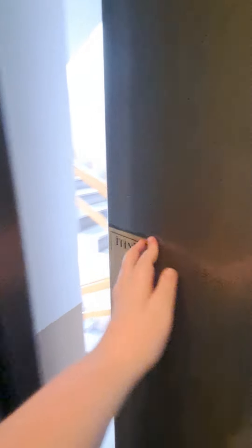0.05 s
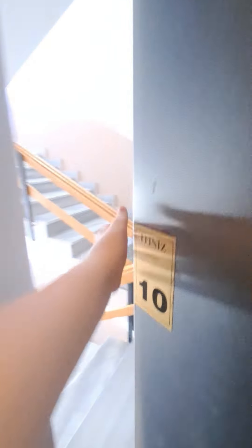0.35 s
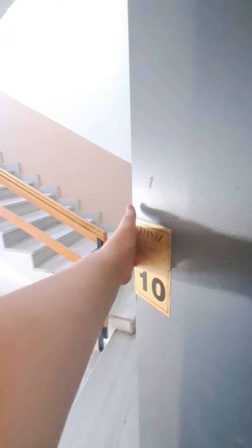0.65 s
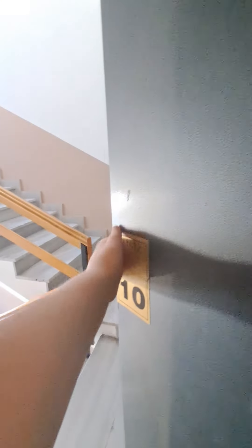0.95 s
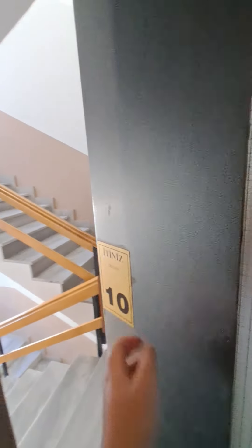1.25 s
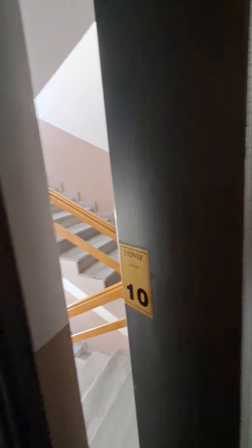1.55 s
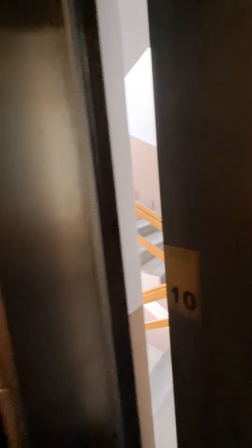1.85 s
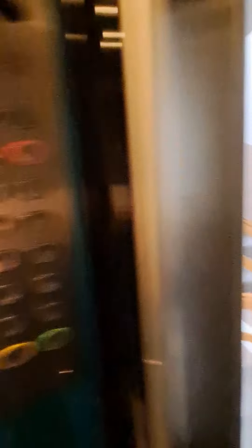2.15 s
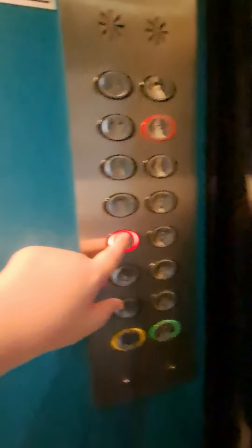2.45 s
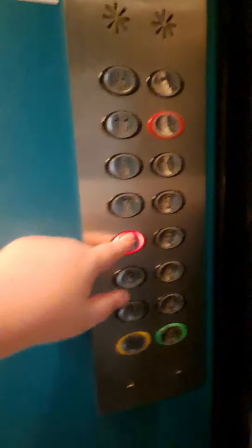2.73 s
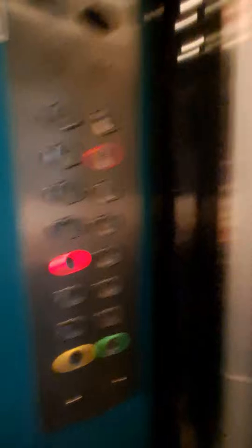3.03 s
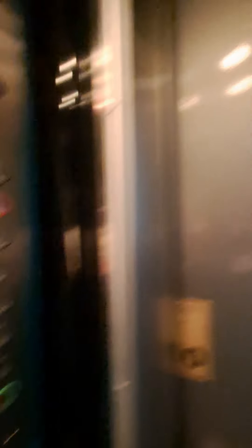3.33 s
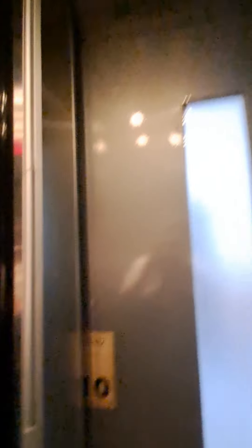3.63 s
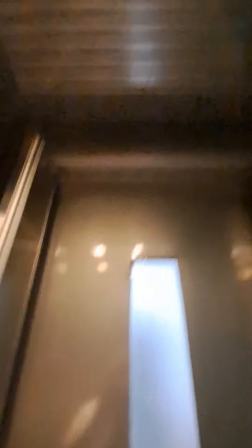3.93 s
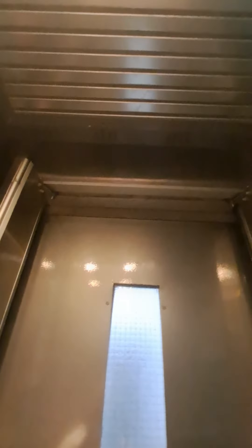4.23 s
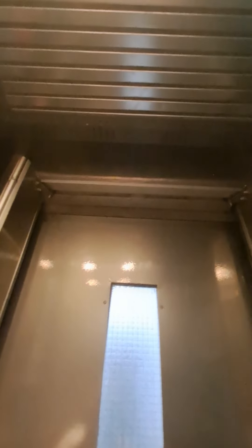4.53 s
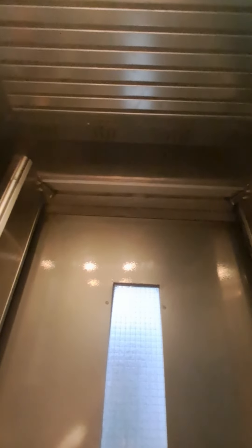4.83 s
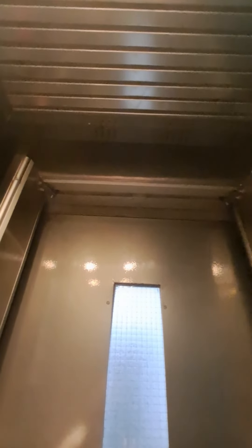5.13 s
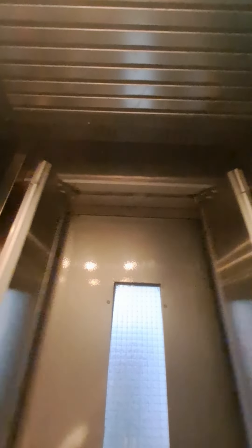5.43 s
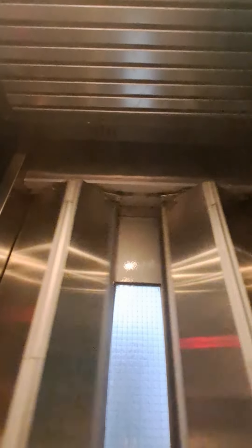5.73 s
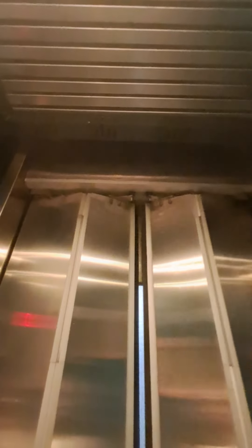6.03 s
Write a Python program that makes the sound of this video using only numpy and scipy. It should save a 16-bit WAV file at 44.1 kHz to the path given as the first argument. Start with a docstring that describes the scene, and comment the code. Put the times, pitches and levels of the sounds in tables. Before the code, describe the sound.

A few knocks on a metal door give way to heavy, booming steps, clothing rustle and small clicks as a person enters an elevator. The outer door then bangs shut and grinds into its frame. After sharp relay clacks, folding doors rumble along their track, clattering and squeaking thinly. The handheld microphone is inside the ringing steel cabin, picking up soft low bumps and a faint fan hum.

```python
"""Doors of an old steel lift

A hand works the hinged landing door; someone steps onto the booming floor and presses a button.
The door slams and shudders home, a relay clacks, and folding inner doors rattle along their track.
Impacts and friction excite the damped modes of the steel, while a faint fan hums throughout."""
import sys
import numpy as np
from scipy import signal
from scipy.fft import rfft, irfft, next_fast_len
from scipy.io import wavfile
from scipy.ndimage import uniform_filter1d

SR = 44100
rng = np.random.default_rng(int(sys.argv[2]) if len(sys.argv) > 2 else 0)


def waveform_to_disk(signal):
    """Save audio, clipped to [-1, 1], as 16-bit WAV at the path in sys.argv[1]."""
    frames = np.transpose(np.atleast_2d(signal))
    scaled = np.clip(frames, -1, 1) * 32767
    samples = np.round(scaled).astype(np.int16)
    wavfile.write(sys.argv[1], SR, samples)


N = 268128
T = np.arange(N) / SR
RING_SIZE = 32768  # samples in one impulse response
RING_FREQS = np.fft.rfftfreq(RING_SIZE, 1 / SR)

# Impacts. Each row: start in seconds, nominal body, clank, clack and tick levels in dB,
# pitch of the struck part in Hz.
SLAM_HITS = [(3.812, -34, -28.5, -29.5, -37, 3450), (3.824, -34.5, -22.5, -27, -43.5, 310),
             (3.841, -34.5, -26.5, -17, -16, 11550), (3.852, -38.5, -22.5, -25.5, -32.5, 2680),
             (3.872, -35.5, -27, -28.5, -45, 487), (4.102, -42, -42, -41.5, -69, 2100),
             (4.126, -30.5, -24.5, -53, -64, 3400)]  # the landing door meets latch and frame, then settles
RELAY_HITS = [(4.542, -73, -75, -54, -54.5, 6960), (4.587, -57, -44.5, -41, -40, 1235),
              (4.857, -48, -59, -50.5, -51.5, 6830)]  # door lock and motor relay
LEAF_HITS = [(4.899, -50, -40, -54.5, -58, 750), (4.949, -44, -40, -37, -49, 2700),
             (5.022, -30, -33.5, -43.5, -38.5, 2120), (5.076, -28.5, -38.5, -44.5, -81, 1365),
             (5.226, -36.5, -36, -42.5, -44.5, 1480), (5.254, -33.5, -43, -43, -45.5, 910),
             (5.314, -30.5, -68, -38, -53, 396), (5.377, -63, -46, -27.5, -44, 3900),
             (5.414, -37.5, -25, -39.5, -59, 3520), (5.49, -44.5, -30, -36, -41.5, 2860),
             (5.547, -32.5, -34, -30.5, -34.5, 2330), (5.6, -30, -28, -42, -56, 423),
             (5.643, -36, -33, -28, -50, 907), (5.675, -69, -25.5, -37, -40.5, 2780),
             (5.705, -31, -26.5, -37, -64, 3720), (5.838, -54, -23, -32, -51, 1315),
             (5.917, -43, -34, -24.5, -40.5, 2580), (5.962, -44, -24.5, -22, -36, 3450),
             (5.99, -48, -30, -28, -51, 2060), (6.012, -34.5, -27.5, -33.5, -32, 1400)]  # folding leaves knock in their hinges
ENTRY_HITS = [(0.005, -30.5, -32.5, -48, -56, 473), (0.036, -32.5, -30.5, -43.5, -43.5, 540),
              (0.08, -37, -40, -35, -77, 466), (0.242, -31, -41.5, -36.5, -40.5, 550),
              (0.453, -33, -39, -35.5, -43, 5670), (0.565, -47, -42, -56, -58, 553),
              (0.981, -48, -48, -59, -58, 372), (1.194, -55, -49, -68, -75, 380),
              (1.293, -49, -42, -41, -59, 2130), (1.713, -56, -54, -54.5, -59.5, 3950),
              (1.878, -52, -46, -43, -47, 6800), (2.003, -33.5, -34.5, -30.5, -79, 1180),
              (2.055, -34, -31, -32, -80, 367), (2.162, -50, -47, -39.5, -79, 375),
              (2.229, -50.5, -38.5, -42.5, -43.5, 382), (2.348, -34.5, -38, -27, -36.5, 1600),
              (2.503, -32, -36, -43, -44.5, 390), (2.644, -45, -38, -44, -79, 400),
              (2.704, -32, -59, -45.5, -39, 377), (2.788, -42, -43, -37.5, -38, 1700),
              (2.848, -45.5, -38, -35.5, -45, 780), (3.248, -60.5, -56.5, -51, -65, 1670),
              (3.312, -51, -45, -39, -61, 1970), (3.421, -27.5, -37.5, -32.5, -45.5, 2850)]  # hand, door, shoes and button
# Edges of the body, clank, clack and tick bands in Hz.
BAND_EDGES_HZ = [130, 400, 1500, 7000, 16000]

# Normal modes. Each row: frequency in Hz, level over the diffuse ring in dB, T60 in seconds.
DOOR_MODES = [(109, 7, 0.99), (303.6, 11.1, 0.23), (353, 2.5, 0.29), (487, 8, 0.33), (593, 5.7, 0.31),
              (781, 4.4, 0.38), (910, 11, .25), (1321, 8.7, 0.22), (1435, 8, 0.19), (2636, 5, 0.12),
              (2603, 5.2, .14), (4665, 7, .08), (8100, 3.1, 0.073), (9780, 8, 0.051), (11700, 6, 0.055),
              (12500, 9.5, 0.058)]
RELAY_MODES = [(953, 2.5, 0.18), (1220, 9.86, .09), (1320, 19, 0.22), (2040, 4, 0.98), (6550, 8.8, 0.2),
               (6850, 7.8, 0.29), (12430, 4.8, 0.23)]
LEAF_MODES = [(237.1, 15.6, 0.6), (366.6, 6.9, 0.33), (382.7, 2.5, 0.29), (433.6, 9.4, 0.41),
              (549, 3.8, 0.074), (638.5, 12.6, 0.38), (904, 7.6, 0.23), (1105, 3.9, 0.23),
              (1376, 8.1, 0.13), (2081, 11, 0.13), (2546, 4.3, 0.072), (3550, 1, 0.084), (3810, 2.2, 0.08),
              (6600, 4, .05)]
CABIN_MODES = [(186, 11.5, 0.61), (242, 2, 0.78), (303.3, 10.5, 0.15), (492, 13.5, 0.58), (1910, 1.5, .04),
               (2510, 2, 0.028), (2853, -6, 0.071)]
# Diffuse ring of the steel box. Each row: frequency in Hz, base T60 in seconds.
RING_DECAY = [(100, 0.23), (400, 0.28), (1500, 0.26), (5000, 0.23), (14000, 0.2)]
# Stereo width. Each row: frequency in Hz, side minus mid in dB.
STEREO_WIDTH = [(50, -15.5), (140, -14), (260, -10), (500, -5), (1000, 0.5), (12000, 0.5)]
# Resonances of the rollers and of the hinges in Hz.
ROLLER_HZ = [438.4, 618, 820, 917, 1096]
HINGE_HZ = [1220, 2230, 2550, 2900, 3660]

# The landing door shakes on its hinges. Each row: start and hold in seconds, level in dB.
DOOR_SHAKES = [(3.8, .15, -30), (4.11, 0.027, -29), (4.25, 0.021, -34)]
# The closer drags it along the frame. Each row: start and hold in seconds, grind and buzz in dB.
DOOR_DRAGS = [(3.788, .01, -44, -47), (3.81, .04, -37, -32), (3.9, 0.24, -36, -51),
              (4.04, 0.0703, -34, -51)]
# The inner leaves rattle as they unfold and meet. Each row: start and hold in seconds, level in dB.
RATTLE_BOUTS = [(4.92, 0.34, -62), (5.23, .02, -41), (5.4, 0.016, -31), (5.49, .01, -33.5),
                (5.56, 0.02, -31), (5.66, 0.056, -34), (5.87, .03, -34.5), (5.955, 0.035, -27)]
# Pushes and shifts of weight. Each row: start and hold in seconds, floor sway and wall boom in dB.
PUSHES = [(-0.03, .08, -27.5, -29), (0.27, 0.22, -47, -40), (0.72, 0.059, -42, -42),
          (1.0, .13, -42.5, -42.5), (1.33, 0.021, -54, -49), (1.6, 0.41, -44, -55.5),
          (1.9, 0.068, -32, -37.5), (2.02, 0.15, -26, -25.5), (2.41, 0.19, -29.5, -33),
          (2.62, 0.1, -27.5, -35.5), (2.88, 0.21, -35.5, -52.5)]
# Their bearing as the microphones turn. Each row: time in seconds, left minus right in dB.
PUSH_PAN = [(0.3, -0.5), (0.6, -3.5), (1.4, -1.5), (1.8, 0)]
# Hand, shoes and clothes rub. Each row: start and hold in seconds, scuff and rustle in dB.
STROKES = [(-0.03, .03, -37, -46.5), (0.18, .03, -38, -48.5), (0.24, 0.027, -43, -47.5),
           (0.55, 0.016, -51.5, -51.5), (0.66, 0.0084, -45.5, -59.5), (1.0, 0.13, -51, -61),
           (1.55, 0.02, -64, -50), (1.9, .05, -41, -37.5), (2.02, 0.034, -31.5, -45.5),
           (2.26, 0.1, -44, -42), (2.34, 0.025, -30, -43), (2.66, .16, -48, -49), (2.94, 0.11, -95, -49)]
# Low thumps, dry slips. Each row: start in seconds, pitch in Hz, peak in dB, length in seconds.
THUMPS = [(0.062, 86, -22, 0.084), (0.896, 75.4, -28, 0.027), (1.098, 79, -32, 0.036),
          (1.989, 56.3, -16, 0.052), (2.04, 173.4, -18, 0.14), (2.429, 41.4, -17.5, 0.069),
          (2.44, 29, -24.5, 0.16), (2.646, 31, -21, 0.091), (2.657, 63.7, -20, 0.086),
          (2.733, 56, -18, 0.043), (3.42, 178.5, -40.5, 0.14), (3.917, 99, -31, 0.048),
          (4.115, 93.3, -21, 0.072), (5.132, 82, -18, 0.043), (5.429, 78.4, -23.5, 0.058),
          (5.619, 80.5, -20.5, 0.086), (5.692, 238.6, -23, 0.082), (5.976, 79.4, -21, 0.08)]
SQUEAKS = [(0.03, 12040, -35, 0.019), (0.242, 12070, -33.5, 0.032), (0.569, 12050, -41.5, 0.025),
           (1.216, 12000, -54, 0.023), (2.39, 9800, -42, 0.012), (2.499, 9660, -32.5, .012),
           (5.361, 9800, -34.5, 0.039), (5.47, 13000, -35, 0.041), (5.495, 13000, -33, 0.024),
           (5.909, 12740, -29, 0.071), (5.936, 9900, -27, 0.02)]
# Motor hum of the fan. Each row: frequency in Hz, rms level in dB.
FAN_TONES = [(91.5, -61.5), (167, -72.5), (242, -71), (344.5, -75.5)]

# Spectral envelopes. Each row: frequency in Hz, relative spectral density in dB.
DOOR_SHAKE_COLOUR = [(20, -24.5), (50, 8.5), (75, 8), (93, 24.5), (108, 17.5), (140, -61.5)]
GRIND_COLOUR = [(100, -17.5), (160, 2), (240, -4), (300, -13), (370, -0.5), (520, -7.5), (650, -8),
                (850, -9.5), (1100, -17.5), (1500, -21.5), (2500, -49)]
BUZZ_COLOUR = [(900, -22.5), (1600, -3), (2800, -3), (4200, -10), (6000, -9.5), (8000, -18), (12000, -14.5),
               (16000, -22.5)]
TRACK_SWAY_COLOUR = [(20, -13), (50, 8), (65, 10), (83, 10), (105, 9.5), (150, -55)]
ROLLER_COLOUR = [(100, 1), (150, 8), (200, -7), (240, -1), (290, -2.5), (420, 0.5), (650, -7), (1000, -8.5),
                 (1500, -12), (2500, -34.5)]
HINGE_COLOUR = [(900, -21), (1600, -1), (2600, 4.5), (4000, 3), (5200, -3), (6500, -6), (7800, -17),
                (10000, -13), (13000, -11.5), (16000, -43)]
FLOOR_SWAY_COLOUR = [(20, 8.5), (30, 0), (42, -6.5), (56, 23), (70, 15), (86, 18), (100, 13), (118, -9),
                     (150, -43)]
WALL_BOOM_COLOUR = [(110, -19), (145, -5), (163, -3), (173, 2.5), (186, -6), (205, -13), (240, -8),
                    (275, -19), (340, -16.5), (450, -29.5), (700, -76.5)]
SCUFF_COLOUR = [(250, -16), (330, 2), (480, -1), (650, -3), (1000, -3.5), (1500, -6.5), (2500, -36)]
RUSTLE_COLOUR = [(900, -34), (1600, 13.5), (2700, 12), (4500, 6.5), (6500, 7), (7800, -2.5), (12500, -0.5),
                 (16000, -4)]
FAN_COLOUR = [(25, -1.5), (60, 0), (92, 4), (134, -11.5), (242, -24), (354, -13.5), (500, -27.5),
              (1000, -30.5), (1500, -36.5), (2000, -37.5), (2500, -44), (16000, -51.5)]


def landing_door():
    """Impact and sliding friction: the door strikes latch and frame, shudders and grinds home."""
    shake = swells(DOOR_SHAKES, attack_s=0.017, t60_s=0.54) * rumble(DOOR_SHAKE_COLOUR, steady_s=0.06)
    grind, buzz = swells(DOOR_DRAGS, attack_s=0.017, t60_s=0.58)
    grinding = grind * friction(GRIND_COLOUR, DOOR_MODES, per_s=700, scatter_db=2.9)
    buzzing = buzz * friction(BUZZ_COLOUR, [], per_s=900, scatter_db=4.7)
    slam = impacts(SLAM_HITS, DOOR_MODES, ring_scale=0.89, bass_db=3.5, top_db=-13,
                   treble_pan_db=-2, part_db=7, part_q=9)  # the latch is on the right
    return shake + grinding + buzzing + slam


def folding_doors():
    """Rolling contact: sway and roller noise grow as powers of motor speed, while loose hinges rattle."""
    motor_start_s, spin_up_s = 4.732, 0.7
    speed = 1 - np.exp(-np.maximum(T - motor_start_s, 0) / spin_up_s)
    rattle = swells(RATTLE_BOUTS, attack_s=0.025, t60_s=0.5)
    rollers = joints(ROLLER_COLOUR, ROLLER_HZ, per_s=80, scatter_db=4, load_shift_db=9)
    hinges = joints(HINGE_COLOUR, HINGE_HZ, per_s=45, scatter_db=4.5, load_shift_db=5)
    sway = undb(-26.5) * speed ** 1.42 * wobble() * rumble(TRACK_SWAY_COLOUR, steady_s=0.08)
    return sway + undb(-27.5) * speed ** 1.88 * rollers + rattle * hinges


def leaf_clatter():
    """Backlash: the folding leaves knock in their hinges and ring at their normal modes."""
    return impacts(LEAF_HITS, LEAF_MODES, ring_scale=1.22, bass_db=-9, top_db=-5.5,
                   treble_pan_db=2.5, part_db=7, part_q=18)


def relay():
    """Brief contact gives a broad spectrum: the lock and motor relay pull in with bright clacks."""
    return impacts(RELAY_HITS, RELAY_MODES, ring_scale=0.97, bass_db=-2, top_db=1,
                   treble_pan_db=2, part_db=5.5, part_q=8.8)


def passenger():
    """Structure-borne sound: weight shakes the cabin, shoes and clothes rub, hand and feet knock."""
    sway, boom = swells(PUSHES, attack_s=0.019, t60_s=1.29)
    floor = sway * wobble() * rumble(FLOOR_SWAY_COLOUR, steady_s=0.04)
    walls = boom * rumble(WALL_BOOM_COLOUR, steady_s=0.075)
    bearing = pan_gains(np.interp(T, *np.transpose(PUSH_PAN)))
    scuff, rustle = swells(STROKES, attack_s=0.028, t60_s=0.52)
    shuffle = envelope(0, attack_s=0.028, hold_s=3.35, t60_s=0.52)  # faint motion between strokes
    shoes = np.hypot(scuff, undb(-56) * shuffle) * friction(SCUFF_COLOUR, [], per_s=500, scatter_db=4.4)
    rustle = np.hypot(rustle, undb(-64.5) * shuffle)
    clothes = rustle * friction(RUSTLE_COLOUR, [], per_s=400, scatter_db=3.8)
    knocks = impacts(ENTRY_HITS, CABIN_MODES, ring_scale=0.97, bass_db=1, top_db=-10.5,
                     treble_pan_db=1.5, part_db=4.5, part_q=10.5)
    return (floor + walls) * bearing + shoes + clothes + knocks


def thumps():
    """Tone bursts: soft low thumps of a few cycles, from bumps in the cabin and microphone handling."""
    out = np.zeros((2, N))
    for start_s, hz, db, length_s in THUMPS:
        t = np.arange(int(length_s * SR)) / SR
        add(out, start_s, undb(db) * np.sin(np.pi * t / length_s) * np.sin(2 * np.pi * hz * t))
    return out


def squeaks():
    """Frictional excitation: dry metal slips and drives a high resonance that lingers in the cabin."""
    out, half_width_hz = np.zeros((2, N)), 450
    for start_s, hz, db, length_s in SQUEAKS:
        slip = rng.standard_normal(RING_SIZE) * (np.arange(RING_SIZE) < length_s * SR)
        resonance = 1 / (1 + 1j * (RING_FREQS - hz) / half_width_hz) ** 2
        chirp = irfft(rfft(slip) * steel([], ring_scale=0.7) * resonance)
        add(out, start_s, undb(db) * chirp / np.abs(chirp).max())
    return out


def fan():
    """Broadband and tonal noise: softly moving air over a wavering motor hum."""
    hum = 0
    for hz, db in FAN_TONES:
        pitch_hz = hz * (1 + 0.018 * wander(per_s=5.9))
        hum += undb(db) * np.sqrt(2) * np.sin(2 * np.pi * np.cumsum(pitch_hz) / SR)
    return hum + undb(-52) * rumble(FAN_COLOUR, steady_s=0.86)


def impacts(table, modes, ring_scale, bass_db, top_db, treble_pan_db, part_db, part_q):
    """Source and filter: each knock rings the steel with its own body, clank, clack and tick levels."""
    out, edges = np.zeros((2, N)), np.array(BAND_EDGES_HZ)
    centres = np.sqrt(edges[:-1] * edges[1:])
    bandwidth_db = 10 * np.log10(np.diff(edges) / (SR / 2))
    # the far microphone lies in an acoustic shadow for treble
    shadow = pan_gains(over_bins([(4000, 0), (11000, treble_pan_db)], RING_SIZE))
    for start_s, *bands_db, part_hz in table:
        body, clank, clack, tick = np.array(bands_db) - bandwidth_db
        colour = [(40, body + bass_db - 29.5), (90, body + bass_db),
                  *zip(centres[:3], (body, clank, clack)), (6400, 0.53 * clack + 0.41 * tick - 0.5),
                  (7600, tick + 0.5), (12300, tick - 2.5), (15000, tick + top_db)]
        ring = steel(modes, ring_scale) * minimum_phase(colour, RING_SIZE)
        add(out, start_s, irfft(ring * loose_part(part_hz, part_db, part_q) * shadow))
    return out


def steel(modes, ring_scale):
    """Modal superposition: the stereo spectrum of a diffuse ring with a few modes standing out."""
    t = np.arange(RING_SIZE) / SR
    noise = rfft(rng.standard_normal((2, RING_SIZE)))
    ring_hz, ring_s = np.transpose(RING_DECAY)
    diffuse = 0
    for share, t60 in zip(np.eye(len(RING_DECAY)), ring_s * ring_scale):
        band = irfft(noise * np.interp(np.log(RING_FREQS + 1), np.log(ring_hz), share))
        diffuse += band * np.exp(-np.log(1000) * t / t60)
    build_up = 1 - np.exp(-t / 0.0036) / 2  # wall echoes join the direct sound
    mid, side = rfft(diffuse * build_up)
    diffuse_rms = np.sqrt(np.mean(np.abs(mid) ** 2))
    for hz, db, t60 in modes:
        half_width = np.log(1000) / (2 * np.pi * t60)
        peak = diffuse_rms * undb(db) * half_width / (half_width + 1j * (RING_FREQS - hz))
        phase = np.exp(2j * np.pi * rng.random(2))  # each blow lands on another spot
        mid, side = mid + phase[0] * peak, side + phase[1] * peak
    width = undb(over_bins(STEREO_WIDTH, RING_SIZE))
    return np.array([mid + width * side, mid - width * side]) / np.sqrt(1 + width ** 2)


def loose_part(hz, gain_db, q):
    """Sympathetic resonance: a small part rings along; at a given Q, higher pitches die sooner."""
    return 1 + undb(gain_db) / (1 + 2j * q * (RING_FREQS - hz) / hz)


def friction(colour, modes, per_s, scatter_db, part=1):
    """Shot noise: small random contacts keep the steel, and any loose part, ringing; rms near 1."""
    size = N + RING_SIZE
    onsets = np.flatnonzero(rng.random(size) < per_s / SR)
    strength, sign = rng.random((len(onsets), 2)).T
    contacts = np.zeros(size)
    contacts[onsets] = np.sign(sign - 0.5) * undb(scatter_db * np.minimum(-np.log(strength), 4))
    ring = irfft(steel(modes, ring_scale=1) * minimum_phase(colour, RING_SIZE) * part)
    return steady(signal.oaconvolve(contacts[None], ring, axes=1)[:, RING_SIZE:size], span_s=0.22)


def joints(colour, pitches_hz, per_s, scatter_db, load_shift_db):
    """Load sharing: constant total power shifts among joints, each with its own resonance."""
    load = np.array([undb(load_shift_db * wander(per_s=16)) for _ in pitches_hz])
    load /= np.sqrt(np.sum(load ** 2, axis=0))
    parts = [loose_part(hz, gain_db=10.5, q=14.5) for hz in pitches_hz]
    return sum(share * friction(colour, LEAF_MODES, per_s, scatter_db, part)
               for share, part in zip(load, parts))


def rumble(colour, steady_s):
    """Filtered noise whose long waves reach both microphones nearly alike; rms near 1."""
    size = next_fast_len(N, True)
    mid, side = irfft(rfft(rng.standard_normal((2, size))) * undb(over_bins(colour, size)), size)
    side = irfft(rfft(side) * undb(over_bins(STEREO_WIDTH, size)), size)
    return steady(np.array([mid + side, mid - side])[:, :N], steady_s)


def swells(table, attack_s, t60_s):
    """Incoherent addition: overlapping events sum in power, giving one gain curve per dB column."""
    power = sum(np.outer(undb(levels), envelope(start_s, attack_s, hold_s, t60_s)) ** 2
                for start_s, hold_s, *levels in table)
    return np.sqrt(power)


def envelope(start_s, attack_s, hold_s, t60_s):
    """Exponential decay after a linear rise and a hold."""
    age = T - start_s
    decay_s = np.maximum(age - attack_s - hold_s, 0)
    return np.clip(age / attack_s, 0, 1) * np.exp(-np.log(1000) * decay_s / t60_s)


def wobble(depth_db=2.5):
    """Random amplitude modulation: the cabin sways unevenly."""
    return undb(depth_db * wander(per_s=14))


def wander(per_s):
    """Linear interpolation of Gaussian values: a slow drift with spread near 1."""
    count = int(T[-1] * per_s) + 2
    return np.interp(T, np.arange(count) / per_s, rng.standard_normal(400)[:count])


def steady(sound, span_s):
    """Normalisation by running power holds the rms near 1."""
    power = uniform_filter1d(np.mean(sound ** 2, axis=0), int(span_s * SR) + 1)
    return sound / np.sqrt(np.maximum(power, 1e-12))


def minimum_phase(points, size):
    """Causality: a response through (Hz, dB) points in which nothing sounds before the blow."""
    cepstrum = irfft(np.log(undb(over_bins(points, size))))
    cepstrum[1:size // 2] *= 2
    cepstrum[size // 2 + 1:] = 0
    return np.exp(rfft(cepstrum))


def over_bins(points, size):
    """Log-frequency interpolation of (Hz, value) points at every bin."""
    hz, value = np.transpose(points)
    return np.interp(np.log(np.fft.rfftfreq(size, 1 / SR) + 1), np.log(hz), value)


def pan_gains(left_minus_right_db):
    """A level difference split evenly between two channels."""
    return undb(np.array([left_minus_right_db, -left_minus_right_db]) / 2)


def undb(db):
    """Decibels to amplitude ratio."""
    return 10 ** (np.asarray(db) / 20)


def add(out, start_s, sound):
    """Superpose a sound from its start time on."""
    start = max(int(start_s * SR), 0)
    out[:, start:start + sound.shape[-1]] += sound[..., :N - start]


def scene():
    """Linear superposition of all sources in the cabin."""
    return (passenger() + landing_door() + folding_doors() + relay() + leaf_clatter()
            + thumps() + squeaks() + fan())


def record(dry):
    """Transduction: more bass on the left, more treble on the right, soft saturation and a low-pass."""
    balance_db = over_bins([(30, -3.0), (70, 2.5), (140, 1.8), (600, 0), (4000, -0.3), (12000, -2.5)], N)
    tinted = irfft(rfft(dry) * pan_gains(balance_db), N)
    ceiling, cutoff_hz = 0.75, 15950
    rounded = ceiling * np.tanh(tinted / ceiling)
    return signal.sosfilt(signal.ellip(10, 0.2, 80, cutoff_hz, fs=SR, output="sos"), rounded)


dry = scene()
out = record(dry)
waveform_to_disk(out)
```